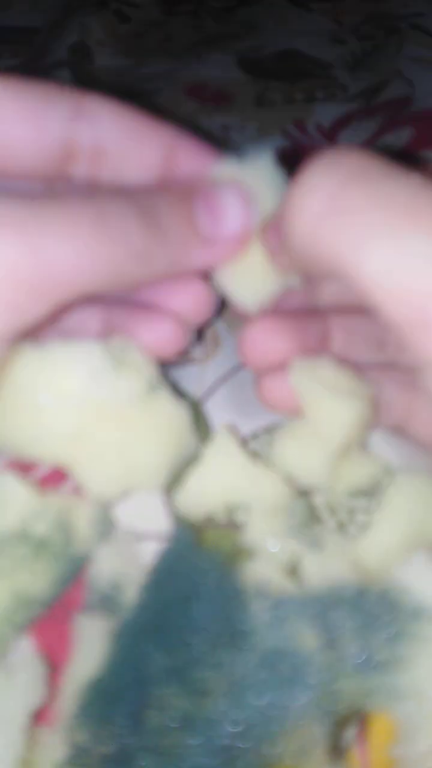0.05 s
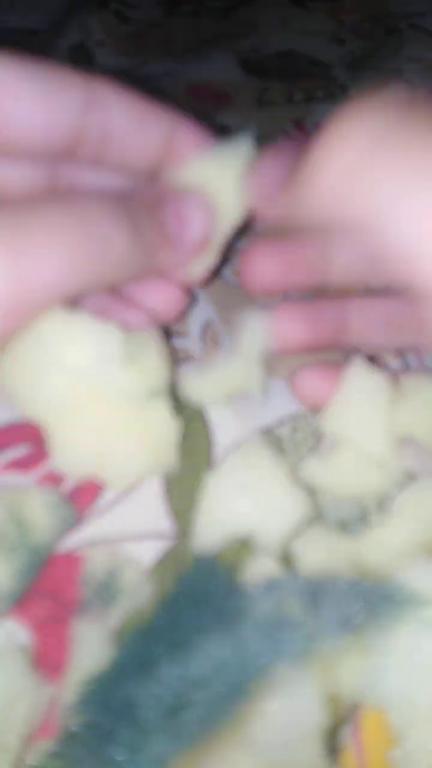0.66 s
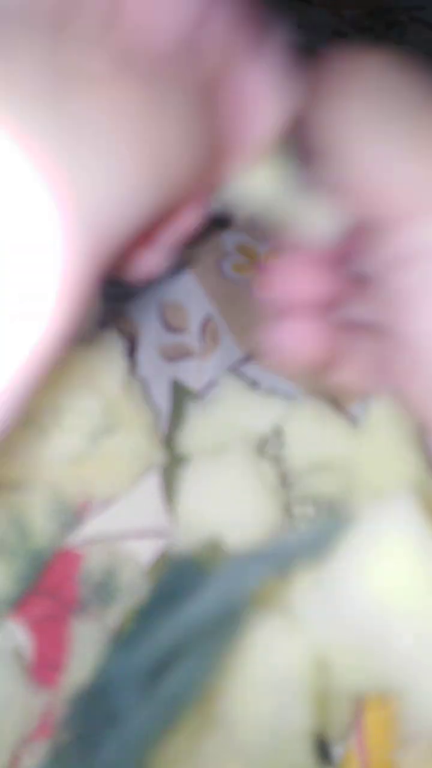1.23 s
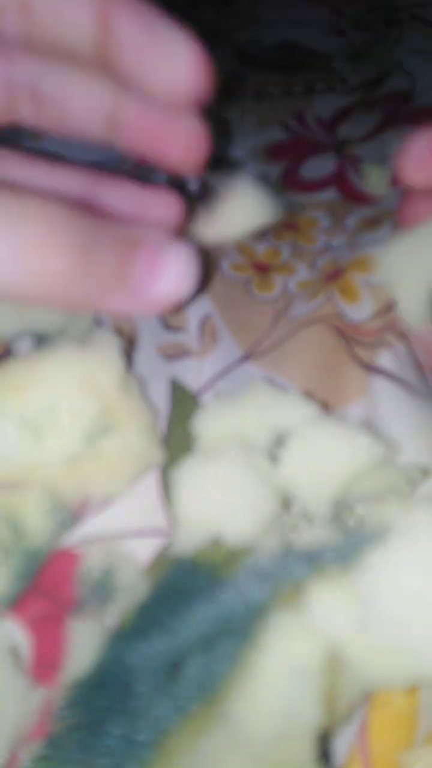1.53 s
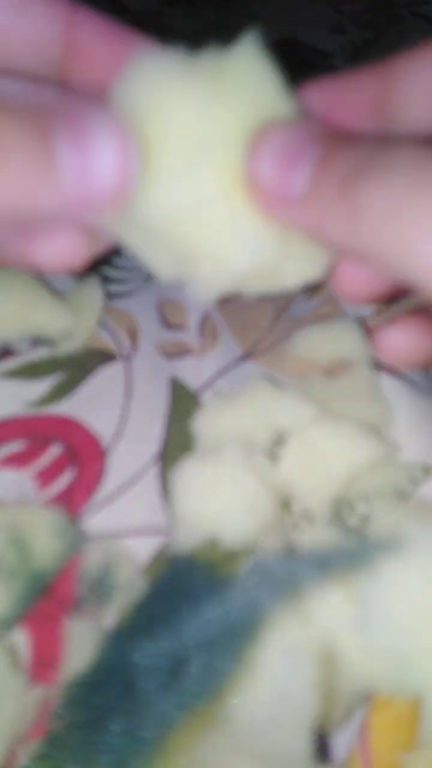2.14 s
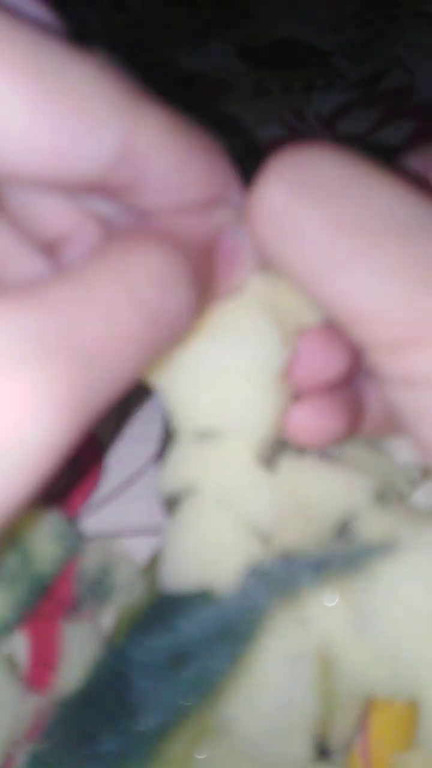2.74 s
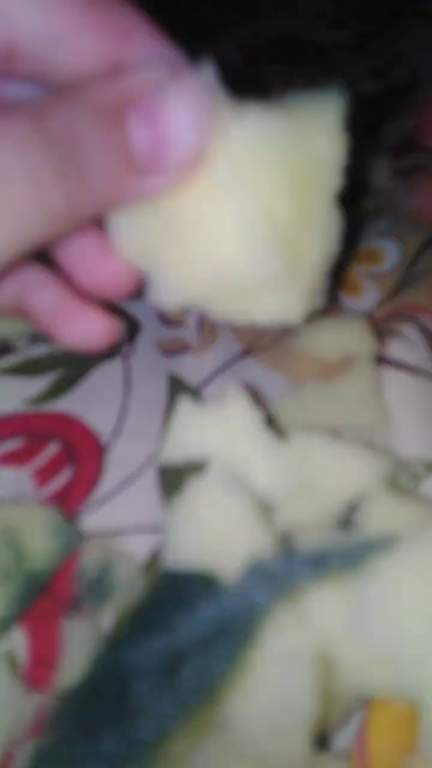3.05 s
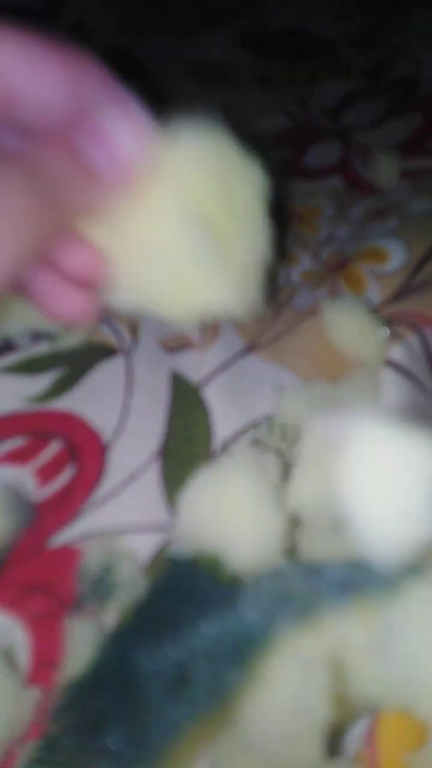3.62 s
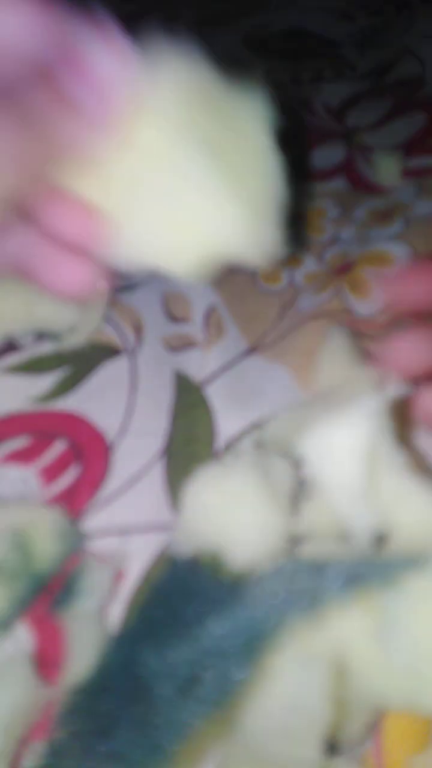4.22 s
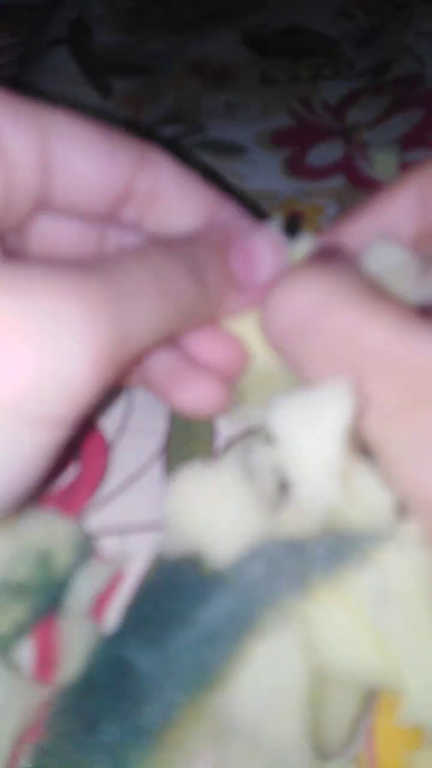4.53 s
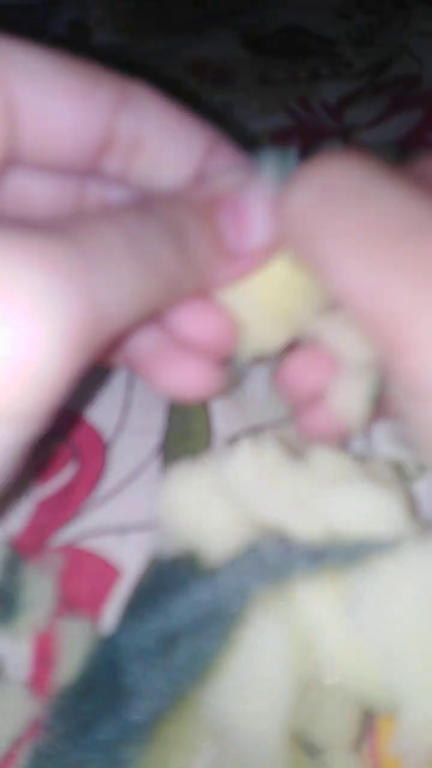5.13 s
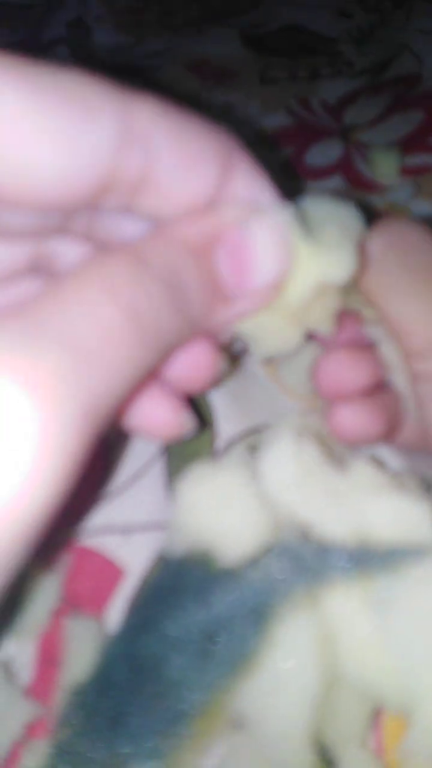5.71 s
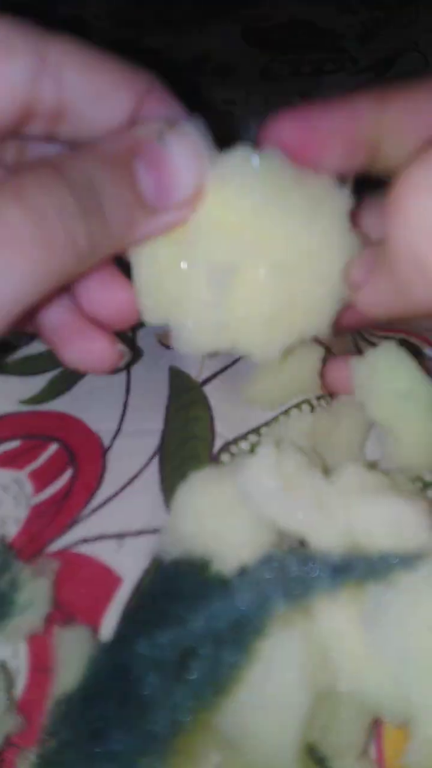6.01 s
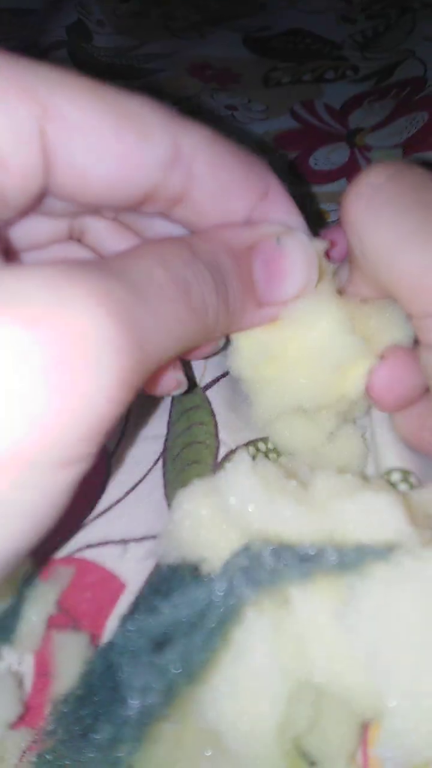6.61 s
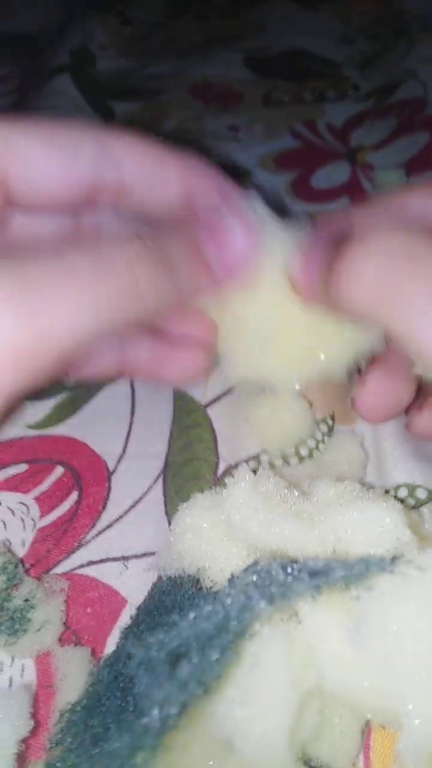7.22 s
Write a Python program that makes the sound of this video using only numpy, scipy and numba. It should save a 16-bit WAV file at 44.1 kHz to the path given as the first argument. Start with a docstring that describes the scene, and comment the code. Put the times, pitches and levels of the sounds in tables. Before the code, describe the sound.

Fingers rip small pieces off a foam sponge in short fizzy tears and pops, with a loud microphone bump near the end.

```python
"""A quiet room, close to a phone: fingers pinch small pieces off a foam sponge.
The foam crackles thinly as it stretches, then rips in a dense fizz of bursting cells until the piece
lets go with a pop and the fingers recoil. Each tear opens from the treble downwards, and the room
answers it. In between, fingertips rustle, rub and thump over a dull hush.
Near the end a hand bumps the phone and overloads its microphone."""
import sys
import numpy as np
from scipy import signal
from scipy.fft import rfft, irfft
from scipy.io import wavfile
from scipy.ndimage import uniform_filter1d
from numba import njit

SR = 44100
rng = np.random.default_rng(int(sys.argv[2]) if len(sys.argv) > 2 else 0)


def store_pcm(level_fs):
    """Save levels as 16-bit WAV."""
    pcm = np.round(np.clip(level_fs, -1, 1) * 32767).astype(np.int16)
    wavfile.write(sys.argv[1], SR, np.atleast_2d(pcm).T)


N = 324576
TIME = np.arange(N) / SR


def undb(db):
    """Decibels to gain."""
    return 10 ** (np.asarray(db) / 20)


def unit(x):
    """Scale to rms 1."""
    return x / np.sqrt(np.mean(x ** 2))


def pan(db):
    """Left and right gains; every pan here is left minus right in dB."""
    return undb(np.array([[db], [-db]]) / 2)


def colour(x, points, size=4096):
    """Minimum-phase EQ through the given (Hz, dB) points."""
    hz, db = np.transpose(points)
    freq = np.maximum(np.fft.rfftfreq(size, 1 / SR), 1)
    curve_db = np.interp(np.log(freq), np.log(hz), db)
    cepstrum = irfft(np.log(undb(curve_db)))
    cepstrum[1:size // 2] *= 2
    cepstrum[size // 2 + 1:] = 0
    return signal.oaconvolve(x, irfft(np.exp(rfft(cepstrum))))[:len(x)]


def walk(rate, count=N):
    """Random drift: `rate` values a second, joined by straight lines."""
    knots = rng.standard_normal(count // 20)
    return np.interp(TIME[:count] * rate, np.arange(len(knots)), knots)


def ramp(start, length_s, db, rise_db, edge_s=.003):
    """A soft-edged fader move, straight in dB; db is its level halfway."""
    gain = np.zeros(N)
    i, count = int(start * SR), int(length_s * SR)
    gain[i:i + count] = undb(db + rise_db * np.linspace(-.5, .5, count))[:N - i]
    return uniform_filter1d(gain, size=max(int(edge_s * SR), 1))


def glide(spans, rest_hz):
    """A pitch that slides over each span and then holds."""
    hz = np.full(N, float(rest_hz))
    for start, length_s, first_hz, last_hz in spans:
        i = int(start * SR)
        hz[i:] = np.interp(TIME[i:], [start, start + length_s], [first_hz, last_hz])
    return hz


@njit
def sweep(x, hz, width_hz):
    """A swept filter; returns its band-pass and high-pass outputs."""
    out, band_state, low_state = np.empty((2, len(x))), 0., 0.
    for i in range(len(x)):
        tuning = np.tan(np.pi * min(hz[i], .45 * SR) / SR)
        damping = width_hz[i] / hz[i]
        band = (band_state + tuning * (x[i] + 1e-18 - low_state)) / (1 + tuning * (tuning + damping))
        low = low_state + tuning * band
        band_state, low_state = 2 * band - band_state, 2 * low - low_state
        out[0, i], out[1, i] = damping * band, x[i] - damping * band - low
    return out


def ring(x, hz, width_hz):
    """Drive a resonance with steep skirts; rms 1."""
    hz, width = hz * np.ones(N), width_hz * np.ones(N)
    band = sweep(x, hz, width)[0]
    return unit(sweep(band, hz, width)[0])


def cells(rate, spread_db):
    """Single cell walls burst: many tiny clicks, a few big ones."""
    size = undb(spread_db * np.minimum(rng.exponential(size=N), 5))
    return (rng.random(N) < rate / SR) * size * rng.choice([-1, 1], N)


def twangs(rate, low_hz, high_hz, ring_s, spread_db):
    """Foam struts twang at random, each with its own pitch and size; rms 1."""
    t = TIME[:SR // 80]
    when, pitch, size = rng.random((int(rate * N / SR), 3)).T[:, :, None]
    hz = low_hz + pitch * (high_hz - low_hz)
    rings = undb(spread_db * size) * np.exp(-t / ring_s) * np.sin(2 * np.pi * hz * t)
    where = (when * (N - len(t))).astype(int) + np.arange(len(t))
    return unit(np.bincount(where.ravel(), rings.ravel(), N))


# EQ of the room tone. Each row: frequency in Hz, gain in dB.
HUSH_EQ = [(25, -25), (52, -0.5), (100, -2.5), (170, -5), (290, 2.5), (450, -9), (700, -4.5), (1100, -12),
           (1500, -11.5), (2000, -18.5), (3200, -21), (5000, -26.5), (8500, -27), (10000, -33),
           (14000, -30)]


def hush(level_db=-66):
    """A dull bed of room tone that wavers a little."""
    shared = rng.standard_normal(N)
    sides = np.array([unit(colour(shared + rng.standard_normal(N), HUSH_EQ)) for _ in range(2)])
    return sides * undb(level_db + .8 * walk(rate=14)) * pan(2.8)


def whine(waver_db=4, end_s=2.6):
    """Two thin, high tones flicker in the hush and fade out."""
    tones = sum(ring(rng.standard_normal(N), hz, width_hz=40) * undb(db + waver_db * walk(rate=9))
                for hz, db in ((8360, -90), (8764, -91)))
    return tones * np.clip((end_s - TIME) / .2, 0, 1)


# EQ of the reverb at each microphone. Each row: frequency in Hz, gain in dB.
REVERB_LEFT_EQ = [(50, -4.5), (120, -4), (300, -2.5), (1000, -7), (2200, -3), (4000, -2), (7000, -5),
                  (13000, -3.5)]
REVERB_RIGHT_EQ = [(50, 0), (120, -3.5), (280, -4), (700, -8), (1300, -8.5), (2200, -8), (4000, -6),
                   (7000, -9.5), (13000, -11.5)]


def room(x, predelay_s=.0034, hold_s=.08, bass_hz=500, bass_fade_s=.54, treble_fade_s=.32):
    """Wall reflections sag gently at first, then die away; the bass lingers longest."""
    t, out = TIME[:SR * 2 // 3], []
    low_pass = signal.butter(2, bass_hz, fs=SR, output="sos")
    late = np.maximum(t - hold_s, 0)
    for channel, eq in zip(x, (REVERB_LEFT_EQ, REVERB_RIGHT_EQ)):
        echoes = rng.standard_normal(len(t)) * (t > predelay_s)
        bass = signal.sosfiltfilt(low_pass, echoes)
        tail = bass * 1e-3 ** (late / bass_fade_s) + (echoes - bass) * 1e-3 ** (late / treble_fade_s)
        tail *= undb(-25 * t)  # a further 25 dB a second over the whole tail
        response = colour(tail / np.linalg.norm(tail), eq)
        out.append(signal.oaconvolve(channel, response)[:N])
    return np.array(out)


# Faint pips between the tears. Each row: centre in seconds, pitch in Hz, level in dB.
FAINT_PIPS = [(.105, 1470, -53), (.732, 2060, -57), (.125, 828, -50.5), (1.787, 660, -49.5),
              (2.371, 1450, -53), (3.06, 1270, -53), (3.204, 823, -50.5), (4.066, 1217, -45.5),
              (4.891, 1520, -47), (4.957, 1580, -53.5), (5.022, 1495, -54.5), (5.358, 2390, -49.5),
              (6.44, 1160, -56.5), (.899, 2040, -62), (1.054, 1510, -61), (2.436, 1060, -58),
              (4.389, 818, -60), (5.752, 1550, -47), (6.322, 1580, -59), (6.379, 1710, -63),
              (7.203, 988, -56), (5.656, 1515, -48.5), (5.827, 1490, -47.5), (7.161, 407, -49.5),
              (7.34, 352, -42.5)]


def pip(centre, hz, db, length_s=.026, scatter=.035, grit=.4):
    """A brief, scratchy chirp of unsteady pitch that fades in and out."""
    out = np.zeros(N)
    span = slice(int((centre - length_s / 2) * SR), int((centre + length_s / 2) * SR))
    t = TIME[span] - centre
    turns = hz * np.cumsum(1 + scatter * walk(rate=500, count=len(t))) / SR
    envelope = np.cos(np.pi * t / length_s) ** 2
    scratch = 1 + grit * walk(rate=900, count=len(t))
    out[span] = undb(db) * envelope * np.sin(2 * np.pi * turns) * scratch
    return out


# Changes of grip. Each row: start in seconds, length in seconds, level in dB.
GRIPS = [(.44, .08, -74), (1.345, .03, -70), (2.83, .08, -57), (3.54, .06, -56), (4.16, .04, -64),
         (4.385, .12, -71), (4.8, .12, -67), (4.94, .16, -71), (5.13, .06, -59), (5.3, .08, -63),
         (5.5, .09, -58), (6.56, .1, -68), (7.03, .15, -73)]


def rustles(pan_db=-8):
    """Fingertips find a new grip and pluck single cells: small, soft crackles."""
    grip = sum(ramp(*row, rise_db=0, edge_s=.02) for row in GRIPS)
    shared, *own = (twangs(rate=200, low_hz=5500, high_hz=14000, ring_s=.003, spread_db=16)
                    + unit(cells(rate=700, spread_db=3)) for _ in range(3))
    sides = [unit(colour(shared + .7 * side, eq)) for side, eq in zip(own, (FIZZ_LEFT_EQ, THIN_RIGHT_EQ))]
    return np.array(sides) * grip * pan(pan_db)


# Skin scuffing foam or phone. Each row: start in seconds, length in seconds, fizz level in dB,
# body in dB relative to the fizz.
SCUFFS = [(.285, .05, -60, 2), (1.243, 0.037, -57, -4), (2.62, .1, -70, 5), (2.845, .06, -61, -12),
          (3.53, .06, -62, -12), (4.165, 0.04, -64, -3), (4.85, 0.06, -64, -2), (5.817, 0.041, -55, -10),
          (5.955, .03, -69, -6), (6.748, .02, -34, 3), (6.775, .02, -45, 6), (6.822, .03, -48, 3),
          (6.895, .03, -52, 4), (6.95, .04, -60, 3), (7.03, .07, -71, 5), (7.195, 0.03, -70, 5),
          (7.29, 0.06, -70, 3)]


def rubs(fade_db=4, rasp_db=-11, treble_pan_db=8.5, body_pan_db=-9.5):
    """Skin slides in small slips: a short, fading scuff in the foam's colours, fuller when pressed."""
    out = np.zeros((2, N))
    slips = cells(rate=3000, spread_db=4) + np.array([cells(rate=3000, spread_db=3.5) for _ in range(2)])
    fizz, rasp, body = (np.array([unit(colour(side, eq)) for side in slips])
                        for eq in (FIZZ_LEFT_EQ, RASP_EQ, BODY_EQ))
    pressed = body * pan(body_pan_db) + undb(rasp_db) * rasp * pan(treble_pan_db)
    for start, length_s, db, body_db in SCUFFS:
        out += ramp(start, length_s, db, -fade_db) * (fizz * pan(treble_pan_db) + undb(body_db) * pressed)
    return out * undb(3.3 * walk(rate=220))


# Foam squeaking on skin. Each row: start and length in seconds, first and last pitch in Hz, level in dB.
PINCH_SQUEAKS = [(2.619, .07, 3800, 3520, -53.5)]


def squeaks(width_hz=520, pan_db=12):
    """Quick slips of the skin drive one narrow, sinking resonance of the pinched foam."""
    hz = glide([row[:4] for row in PINCH_SQUEAKS], rest_hz=PINCH_SQUEAKS[0][2])
    hz *= 1 + .015 * walk(rate=120)
    gain = sum(ramp(start, length_s, db, 0, edge_s=.015) for start, length_s, _, _, db in PINCH_SQUEAKS)
    return ring(cells(rate=6000, spread_db=2.5), hz, width_hz) * gain * pan(pan_db)


# Soft thumps: fingers on foam and hand, and near 6.75 s the hand hitting the phone and rebounding. Each row:
# start in seconds, pitch in Hz, level in dB.
SOFT_THUMPS = [(.34, 102, -44), (.562, 233, -51.5), (.972, 105, -55), (2.118, 95, -53),
               (2.15, 110, -54.5), (1.16, 75, -45), (2.84, 100, -46), (3.362, 105, -48), (3.47, 58, -43),
               (2.91, 112, -43), (3.005, 106, -50.5), (3.094, 90, -51.5), (3.548, 265, -44),
               (3.996, 98, -38.5), (4.477, 250, -49.5), (5.099, 103, -46), (5.11, 290, -49),
               (5.24, 110, -53), (5.505, 295, -48), (5.85, 110, -44), (5.88, 105, -47), (5.95, 84, -48.5),
               (6.024, 110, -54.5), (6.16, 95, -56), (6.6865, 950, -27), (6.738, 90, -31),
               (6.752, 208, -15), (6.772, 85, -34), (6.815, 187, -32.5), (6.9, 240, -39),
               (6.989, 151, -42), (7.04, 100, -46)]
# Pieces letting go. Each row: start in seconds, pop pitch in Hz, then pop level, recoil level, pan in dB.
RELEASES = [(.26, 950, -41.5, -43, -10.5), (1.189, 1390, -51.5, -47, -2.5), (2.745, 190, -45, -35, -7.5),
            (3.415, 880, -26, -36, -9), (3.978, 998, -26, -45, -5), (4.631, 1250, -34, -55, -6),
            (4.673, 400, -37, -45, -13.5), (5.7005, 640, -21, -36, -8.5), (6.686, 338, -20.5, -42, -5.5)]


def blows(pop_rise_s=.0017, recoil_hz=84.2, recoil_lag_s=.007, recoil_rise_s=.0094, thump_pan_db=-8.5):
    """Cue each pop, the recoil of the fingers just after it, and every other thump."""
    for start, hz, pop_db, recoil_db, pan_db in RELEASES:
        yield start, hz, pop_db, pop_rise_s, pan_db
        yield start + recoil_lag_s, recoil_hz, recoil_db, recoil_rise_s, pan_db
    for start, hz, db in SOFT_THUMPS:
        yield start, hz, db, .68 / hz, thump_pan_db  # lower thumps swell more slowly


def thumps(rough=.22, wobble=.22, left_lag_s=.0008):
    """Soft flesh and foam swing for a few uneven cycles and die away, with a dull rub of skin."""
    out, t = np.zeros((2, N)), TIME[:SR // 5]
    skin_eq = [(40, -30), (130, 0), (280, -1), (600, -10.5), (1200, -17.5), (2500, -34), (6000, -64)]
    rub = unit(colour(rng.standard_normal(N), skin_eq))
    for start, hz, db, rise_s, pan_db in blows():
        i = int(start * SR)
        swell = t / rise_s * np.exp(1 - t / rise_s)
        uneven_time = np.cumsum(1 + wobble * walk(hz, count=len(t))) / SR
        turns = hz * (uneven_time - np.array([[left_lag_s], [0]]))
        swing = np.sin(2 * np.pi * turns) + rough * rub[i:i + len(t)]
        out[:, i:i + len(t)] += undb(db) * pan(pan_db) * swell * swing
    return out


# A freed finger hitting the other hand. Each row: centre in seconds, pitch in Hz, level in dB.
FINGER_SLAPS = [(2.8605, 120, -31.5), (3.9915, 350, -30), (5.7063, 200, -19.5), (6.7065, 330, -28),
                (6.8325, 300, -29)]


def slaps(pan_db=-10):
    """Flesh meets flesh: a single push and pull of air."""
    out = np.zeros(N)
    for centre, hz, db in FINGER_SLAPS:
        phase = 2 * np.pi * hz * (TIME - centre)
        out -= undb(db) * phase * np.exp((1 - np.minimum(phase ** 2, 100)) / 2)
    return out * pan(pan_db)


# The hand on the phone. One row: start in seconds, pitch in Hz, level in dB, hold in seconds, pan in dB.
PHONE_BUMP = (6.7464, 113, -5, 0.017, -14.5)


def bump(judder=.25, left_lead_s=.0016, attack_s=.0006, release_s=.003):
    """The hand rocks the phone for a few juddering cycles; one microphone swings first."""
    start, hz, db, hold_s, pan_db = PHONE_BUMP
    t = np.maximum(TIME - start, 0)
    push = (1 - np.exp(-t / attack_s)) * np.exp(-np.clip((t - hold_s) / release_s, 0, 50))
    swing = -np.cos(2 * np.pi * hz * (t + np.array([[left_lead_s], [0]])))
    return undb(db) * pan(pan_db) * push * swing * (1 + judder * walk(rate=800))


# Hard hits on the case during the bump. Each row: start in seconds, level in dB, pan in dB.
CASE_KNOCKS = [(6.7467, -8, -11), (6.7514, -15, 4), (6.7578, -18, -3), (6.7625, -12.5, -12)]
# EQ of the case. Each row: frequency in Hz, gain in dB.
CASE_EQ = [(150, -2), (450, 5), (750, 7), (1150, 5.5), (1550, -10), (2400, -8), (4200, -10), (7000, -13),
           (14000, -19)]


def knocks(decay_s=.0014):
    """The case cracks dryly each time the hand catches it."""
    out, t = np.zeros((2, N)), TIME[:SR // 50]
    for start, db, pan_db in CASE_KNOCKS:
        i = int(start * SR)
        crack = unit(colour(rng.standard_normal(len(t)), CASE_EQ))
        out[:, i:i + len(t)] += undb(db) * pan(pan_db) * crack * np.exp(-t / decay_s)
    return out


# Single strands breaking. Each row: start in seconds, pitch in Hz, level in dB, pan in dB.
STRAND_BREAKS = [(0.237, 9500, -33, -3), (0.256, 6000, -31, 9), (2.616, 6300, -40, 12),
                 (2.725, 5800, -30, 8), (2.758, 6200, -29, 2), (2.7945, 5410, -29.5, 23),
                 (3.341, 13300, -46, -8), (3.361, 10100, -42, -6), (3.4165, 4600, -28, 2),
                 (3.501, 6130, -37, 21), (3.519, 5500, -42, 10), (3.95, 10000, -45, -8),
                 (4.52, 10000, -40, -10.5), (4.633, 5660, -27, 9), (4.859, 7020, -34.5, 12.5),
                 (4.6, 6400, -40, 1), (5.113, 9500, -43, -8), (5.141, 10800, -42, -11),
                 (5.1865, 13800, -35, -6), (5.435, 10000, -37, -6), (5.581, 13500, -38, -11),
                 (5.158, 10500, -39, -8), (5.231, 5900, -36, 9), (5.595, 6200, -39, 3),
                 (5.7045, 6500, -27, -2), (6.538, 9900, -41.5, -16), (6.6875, 9000, -22, -4)]


def strands(rise_s=.00036, grit=.45):
    """Thick strands break with a sharp, briefly ringing tick."""
    out, t = np.zeros((2, N)), TIME[:SR // 100]
    envelope = t / rise_s * np.exp(1 - t / rise_s)
    for start, hz, db, pan_db in STRAND_BREAKS:
        i = int(start * SR)
        crack = unit(colour(rng.standard_normal(len(t)), FIZZ_LEFT_EQ if pan_db > 0 else FIZZ_RIGHT_EQ))
        tick = np.sin(2 * np.pi * hz * t) + grit * crack
        out[:, i:i + len(t)] += undb(db) * pan(pan_db) * envelope * tick
    return out


def deepen(x, strain_hz=7500, rip_hz=3700, end_hz=500):
    """Small cells break first and larger ones later, so a low cut slides down through each tear."""
    spans = []
    for start, length_s, lead_s, *_ in FOAM_TEARS:
        spans += [(start - lead_s, lead_s, strain_hz, rip_hz), (start, length_s, rip_hz, end_hz)]
    cutoff_hz = glide(spans, strain_hz)
    return np.array([sweep(side, cutoff_hz, np.sqrt(2) * cutoff_hz)[1] for side in x])


# EQ of the thin crackle at the right microphone. Each row: frequency in Hz, gain in dB.
THIN_RIGHT_EQ = [(800, -42), (3500, -39), (5300, -19.5), (6800, -15), (8000, -4.5), (9900, 1), (12300, -3),
                 (14000, 2.5), (15000, -6.5)]


def stretching(rise_db=15, pan_db=-9):
    """Before each rip the first cells give way in a thin crackle that grows with the strain."""
    strain = sum(ramp(start - lead_s, lead_s, db + stretch_db - rise_db / 2, rise_db)
                 for start, _, lead_s, db, stretch_db, *_ in FOAM_TEARS)
    shared = cells(rate=1800, spread_db=3.2)
    sides = np.array([unit(colour(shared + cells(rate=2000, spread_db=3.2), eq))
                      for eq in (FIZZ_LEFT_EQ, THIN_RIGHT_EQ)])
    flicker = undb(3 * walk(rate=350) + 1.5 * walk(rate=45) - .5)
    return deepen(sides * strain) * pan(pan_db) * flicker


def crunch(low_hz=4500, high_hz=7500, trim_db=-11.5, pan_db=7):
    """Thicker struts snap one after another, each ringing briefly at its own pitch."""
    shared, *own = (twangs(700, low_hz, high_hz, ring_s=.0015, spread_db=14) for _ in range(3))
    high_pass = signal.butter(4, low_hz, "high", fs=SR, output="sos")
    return undb(trim_db) * pan(pan_db) * unit(signal.sosfilt(high_pass, shared + .6 * np.array(own)))


# EQs of the foam: the fizz at each microphone, the rasp of thicker foam giving way, and the body of
# stretched foam and fingers. Each row: frequency in Hz, gain in dB.
FIZZ_LEFT_EQ = [(800, -32.5), (2800, -30), (4200, -13), (5200, -3), (6200, 2.5), (7500, -6.5),
                (9500, -11.5), (12000, -17.5), (13600, -16), (15000, -26)]
FIZZ_RIGHT_EQ = [(800, -33), (2500, -32), (4000, -25), (5300, -11.5), (6800, -8), (8000, -2), (9900, 1),
                 (11000, -6), (12300, -4), (14000, 0.5), (15000, -9)]
RASP_EQ = [(500, -28), (1450, -13), (2050, -15), (2500, -12.5), (2850, -7), (3150, -4), (3700, 0),
           (4400, -8), (7000, -30)]
BODY_EQ = [(40, -17), (100, 0), (300, -9.5), (600, -1), (1100, 0.5), (1550, -4.5), (2000, -16.5),
           (3200, -22.5), (5000, -38.5)]
# Tears, each a stretch and then a rip. Each row: rip start, rip length and stretch length in seconds,
# fizz level in dB, then stretch, body and rasp in dB relative to the fizz, and fizz pan in dB.
FOAM_TEARS = [(0.229, 0.039, 0.007, -41, -6, -15, -18, 0.5), (1.154, 0.042, 0.0076, -42, -12, -25, -28, -1),
              (2.614, 0.106, .018, -49.5, -6, -20, -12, 4), (2.72, 0.043, .02, -36.5, -5, -16.5, -13, 0.5),
              (3.396, 0.026, 0.054, -36.5, -3.5, -9, -9, -0.5),
              (3.976, .014, 0.031, -33.5, -17, -10, -15, -2.5),
              (4.63, .048, .115, -36.5, -7.5, -9.5, -15.5, -3),
              (5.197, .048, .09, -42.5, -13, -29, -27, -3), (5.432, .041, 0.014, -50, -6, -27, -24, -10),
              (5.61, 0.082, 0.15, -41.5, -9.5, -21, -22, -7), (5.689, .017, .01, -36.5, -10, -8.5, -14, 2),
              (6.686, .022, .06, -34.5, -19, -5, -13, -3.5)]


def tearing(stereo_spread=.95, taut_hz=5900, flap_hz=(1300, 520), flap_db=-7):
    """The tear runs in fits; bursting cells and twanging struts fizz, rasp and shake the freed flap."""
    fizz_gain, body_gain, rasp_gain = np.zeros((3, 2, N))
    for start, length_s, _, db, _, body_db, rasp_db, pan_db in FOAM_TEARS:
        rip = ramp(start, length_s, db, rise_db=4, edge_s=.007)
        fizz_gain += rip * pan(pan_db)
        body_gain += ramp(start, length_s, db + body_db, rise_db=10) * pan(-7)
        rasp_gain += rip * undb(rasp_db) * pan(9.5)
    fits = undb(2.7 * walk(rate=350) + .7 * walk(rate=50) - .6)
    struts = twangs(rate=800, low_hz=608, high_hz=14500, ring_s=.003, spread_db=15)
    shared = unit(cells(rate=5000, spread_db=3)) + struts
    # The taut foam's resonance wanders; the flap rings lower as the rip lengthens.
    taut_pitch = taut_hz * np.exp(.19 * walk(rate=70))
    flap_pitch = glide([(start, length_s, *flap_hz) for start, length_s, *_ in FOAM_TEARS], flap_hz[0])
    treble, body = np.zeros((2, 2, N))
    for side, (eq, taut_db) in enumerate(((FIZZ_LEFT_EQ, -9), (FIZZ_RIGHT_EQ, -19.5))):
        bursts = shared + stereo_spread * unit(cells(rate=5000, spread_db=3.5))
        taut = undb(taut_db) * ring(bursts, taut_pitch, width_hz=1100)
        flap = undb(flap_db) * ring(bursts, flap_pitch, width_hz=650)
        fizz = unit(unit(colour(bursts, eq)) + taut)
        rasp = unit(colour(bursts, RASP_EQ))
        treble[side] = fizz * fizz_gain[side] + rasp * rasp_gain[side]
        body[side] = unit(unit(colour(bursts, BODY_EQ)) + flap)
    return fits * (deepen(treble + crunch() * fizz_gain) + body * body_gain)


def scene():
    """Mix foam, hands and room; the bump reaches the phone mostly by touch, so it gets little reverb."""
    hands = stretching() + rustles() + tearing() + squeaks() + rubs() + thumps()
    ticks = undb(-5) * strands()
    pips = undb(-4) * sum(pip(*row) for row in FAINT_PIPS) * pan(11)
    rocking, cracks, flesh = bump(), knocks(), slaps()
    send = hands + undb(-3) * (ticks + flesh) + undb(-27) * rocking + undb(-8) * cracks + undb(-5) * pips
    return hands + ticks + flesh + pips + rocking + cracks + room(send) + hush() + whine()


def suppress(x, split_hz=2600, threshold_db=-70, depth_db=-6):
    """Noise suppressor: ducks the treble whenever it is faint, which dries the tails."""
    low = signal.sosfilt(signal.butter(2, split_hz, fs=SR, output="sos"), x)
    treble = x - low
    power = np.abs(uniform_filter1d(np.mean(treble ** 2, axis=0), size=900))
    opening = power / (power + undb(threshold_db) ** 2)
    return low + treble * undb(depth_db * (1 - opening))


def record(dry, limit=.68, rumble_hz=36, top_hz=14250):
    """The phone cuts rumble, clips flat on overload, hushes faint treble and drops the very top."""
    thinned = signal.sosfilt(signal.butter(2, rumble_hz, "high", fs=SR, output="sos"), dry)
    hushed = suppress(np.clip(thinned, -limit, limit))
    return signal.sosfilt(signal.ellip(10, .2, 70, top_hz, fs=SR, output="sos"), hushed)


dry = scene()
out = record(dry)
store_pcm(out)
```